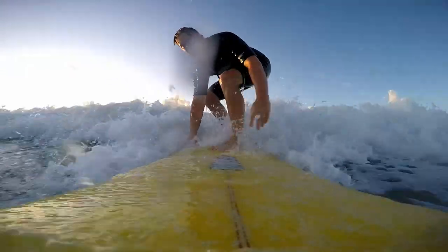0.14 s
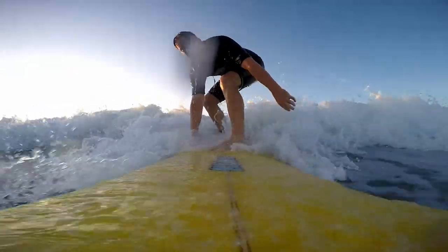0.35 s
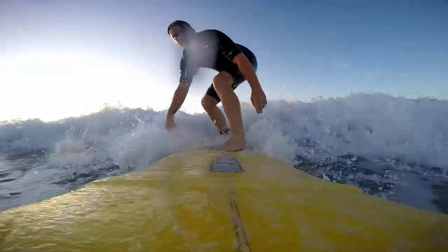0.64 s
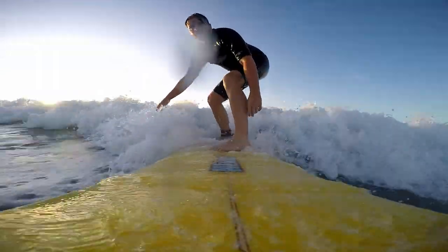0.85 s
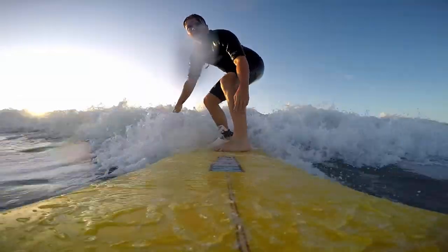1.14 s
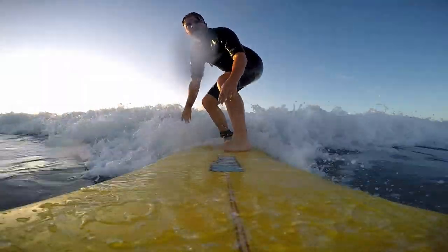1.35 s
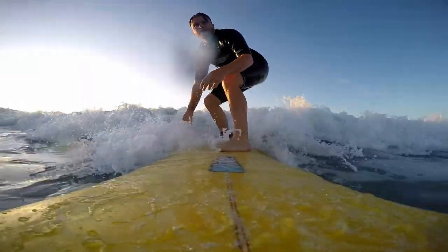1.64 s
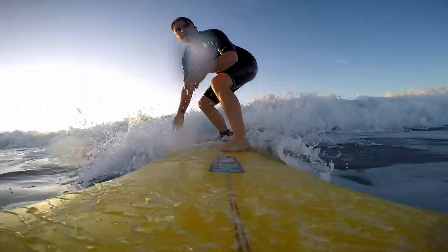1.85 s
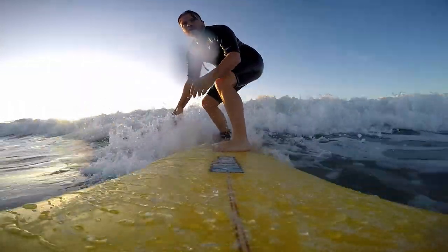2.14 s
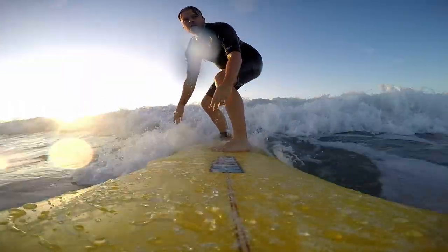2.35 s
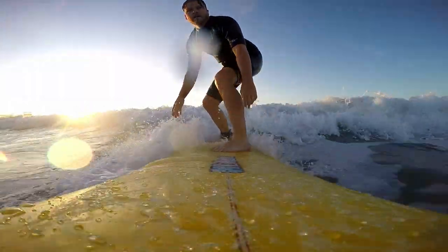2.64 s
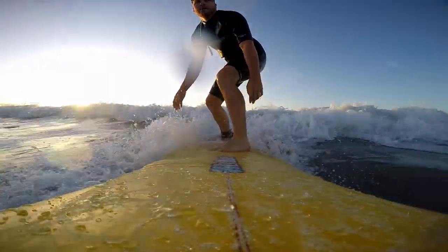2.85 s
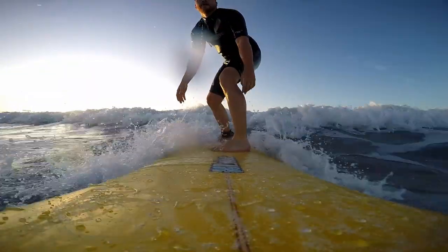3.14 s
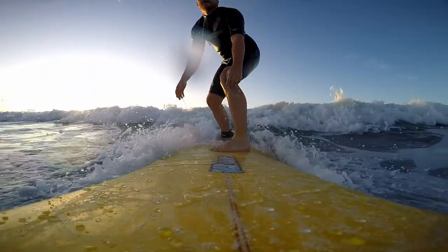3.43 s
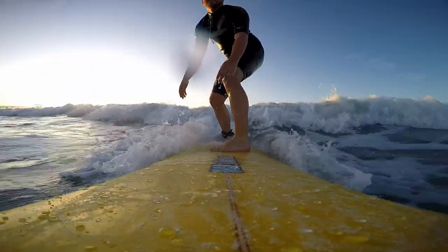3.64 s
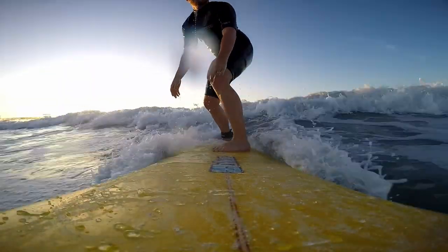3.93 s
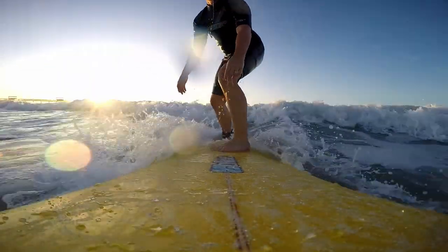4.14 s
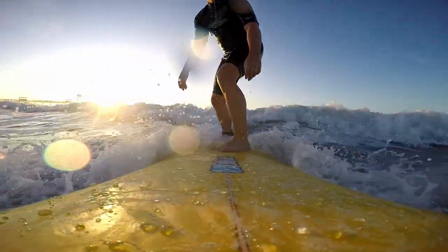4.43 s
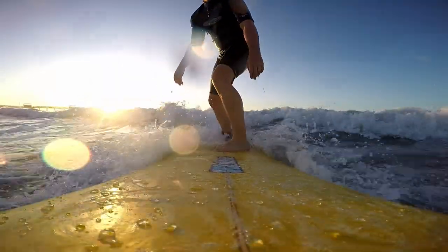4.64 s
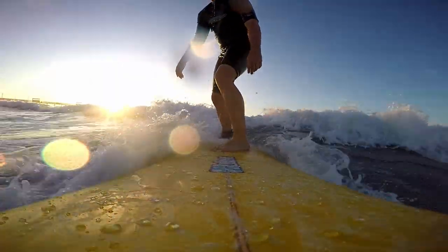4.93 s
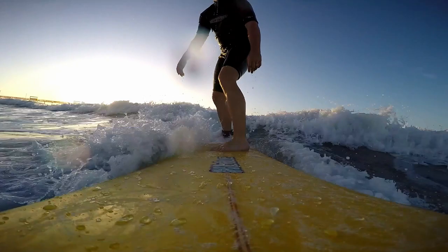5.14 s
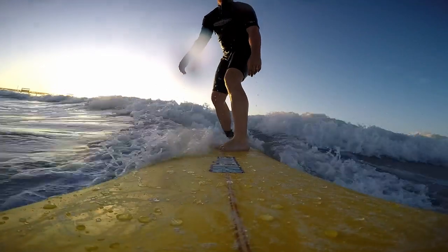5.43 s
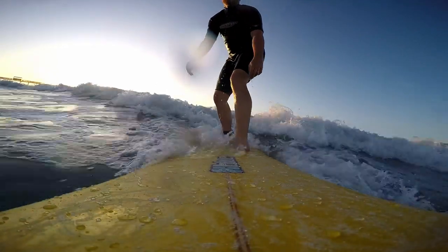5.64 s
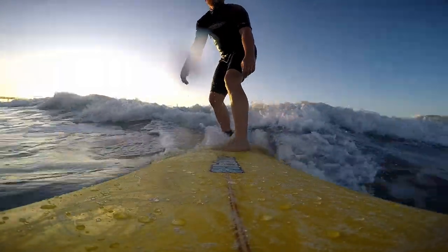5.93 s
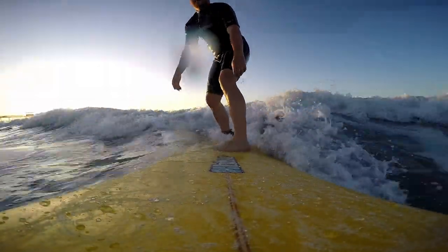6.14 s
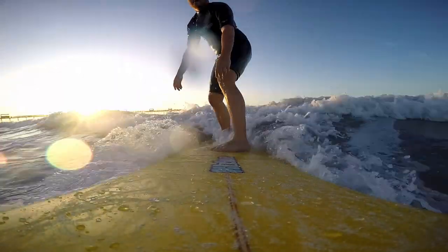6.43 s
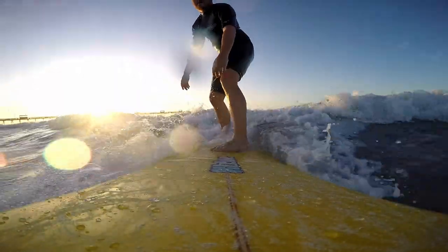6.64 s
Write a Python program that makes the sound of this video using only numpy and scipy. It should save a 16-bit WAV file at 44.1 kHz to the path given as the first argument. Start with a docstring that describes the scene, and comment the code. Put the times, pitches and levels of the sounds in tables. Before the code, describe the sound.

Sealed housing on a surfboard nose, close, dry and muffled. A deep throb near 40 Hz runs throughout, wandering in pitch and pulsing several times a second, with hull drumming around 250 Hz. Over it, whitewater churns in gurgling mid-low bubbles, finer froth and only faint spray hiss. At 0-0.2 s a splash surge, pings and gulps; at 0.4 s a tight cluster of sharp drop knocks and a slap; around 1 s more drops and a flat landing that rings low. Quieter water follows, with booms at 1.4-1.5 and a landing at 2.3. Foam swells towards 3.2, eases, then hollow booms and plastic clacks cluster at 4.1-4.5. Another swell peaks at 5 with brief spray. Slaps and booms hit at 5.4 and 6-6.2, thick gulps at 6.2-6.4, and a hard surge, slap and gulps end it at 6.8. Small plastic rattles recur throughout.

```python
"""Inside a sealed camera housing on the nose of a surfboard that rides a broken wave.
The board bends in a deep, wandering throb; chop drums, slaps and booms on the hull.
Whitewater churns, froths and gulps as clouds of damped bubble tones in coloured noise.
Drops ping, knock and crack on the housing, spray falls as tiny ringing droplets,
and impulses through the mount's plastic resonances make it clack and chatter."""
import sys
import numpy as np
from scipy import signal
from scipy.fft import rfft, irfft, next_fast_len
from scipy.io import wavfile
from scipy.ndimage import uniform_filter1d, map_coordinates

SR = 44100
rng = np.random.default_rng(int(sys.argv[2]) if len(sys.argv) > 2 else 0)


def to_wav(sig):
    """Store sig (one row per channel, or 1-D mono) as 16-bit WAV at the path in sys.argv[1].

    Samples outside -1..1 are clipped; the rate is SR.
    """
    pcm = np.clip(np.atleast_2d(sig), -1, 1) * 32767
    pcm = np.round(pcm).astype(np.int16)
    wavfile.write(sys.argv[1], SR, pcm.T)  # frames by channels


N = 299770

# The broken wave between bumps. Each row: time in seconds, then relative levels in dB
# of churning water, fine foam and airborne spray.
FLOW = [(0.0, -47.5, -53.5, -66.5), (0.36, -45, -52.5, -63), (0.56, -47.5, -53.5, -69),
        (0.9, -48, -56, -71.5), (1.25, -47.5, -55, -70), (1.8, -50.5, -60, -75), (2.1, -44, -50.5, -68),
        (2.7, -40.5, -45, -66), (3.25, -37, -41.5, -61), (3.65, -43, -48, -68), (4.3, -43.5, -46.5, -67.5),
        (5.0, -37.5, -41.5, -65), (5.52, -41.5, -45.5, -65), (5.66, -41, -46.5, -70),
        (5.9, -45.5, -51, -66.5), (6.05, -39, -47, -64), (6.5, -44, -45, -65.5), (6.8, -46.5, -49.5, -64)]
# The board meets a ridge of chop. Each row: centre in seconds, half length in seconds, then relative
# levels in dB of bending and of hull drumming, and the surge of the whitewater in dB.
BUMPS = [(0.006, 0.022, -20, -31.5, 10.5), (0.165, 0.16, -22, -40, 4.5), (0.335, 0.013, -36.5, -32.5, 6.5),
         (0.393, 0.032, -22, -32, 0), (0.462, 0.076, -22, -44.5, 1), (0.663, 0.12, -34, -48.5, 0),
         (0.847, 0.067, -30, -47, -0.5), (1.042, 0.11, -28.5, -46.5, 1), (1.249, 0.13, -35.5, -48.5, -1.5),
         (1.46, 0.08, -22.5, -37.5, 8), (1.596, 0.11, -26.5, -50, 0.5), (1.754, 0.15, -32, -39, 8.5),
         (1.846, 0.039, -27, -38.5, 7.5), (1.992, 0.15, -28.5, -51.5, 0.5), (2.218, 0.054, -22, -42, 1.5),
         (2.302, 0.029, -20, -36, 4.5), (2.362, 0.052, -30.5, -33.5, 2.5), (2.6, 0.046, -26.5, -63, -0.5),
         (2.789, 0.04, -24, -34.5, 2), (2.936, 0.091, -27, -65, -1), (3.173, 0.09, -24, -37, 2),
         (3.296, 0.12, -23, -44, -1.5), (3.464, 0.045, -24, -47, 1), (3.731, 0.055, -28.5, -37, 3),
         (3.839, 0.078, -25, -43, 1), (3.957, 0.055, -25, -40, 2.5), (4.12, 0.039, -33, -33, 0),
         (4.16, 0.14, -23.5, -48, 6.5), (4.424, 0.09, -30, -34, 6.5), (4.717, 0.076, -27.5, -36, 2),
         (4.801, 0.034, -38.5, -47, 4), (4.853, 0.035, -25, -42, -0.5), (5.085, 0.11, -22.5, -38, 2.5),
         (5.314, 0.048, -33, -35.5, 2.5), (5.404, 0.027, -27.5, -37, 3.5), (5.543, 0.035, -23.5, -58, -2),
         (5.648, 0.05, -36.5, -40, 5.5), (5.775, 0.064, -24.5, -43.5, 4.5), (5.887, 0.029, -25, -56, 1),
         (5.997, 0.071, -28, -41.5, 1), (6.156, 0.087, -22, -41, 5), (6.345, 0.058, -23, -38, 5.5),
         (6.536, 0.13, -26.5, -46, 3), (6.683, 0.1, -26, -44.5, 3.5), (6.788, 0.023, -20, -34, 17.5)]
RELEASE = 0.98  # a bump's fall time over its rise time
FROTH_SHARE, SPRAY_SHARE = 1, 0.96  # how much of a surge (in dB) reaches the finer water

# Spectra as heard inside the housing. Each row: frequency in Hz, relative density in dB per Hz.
CHURN_SPECTRUM = [(150, -23), (380, -15), (490, -3), (570, -3), (660, 1), (820, 0), (970, -3.5),
                  (1100, -23), (1600, 0), (2200, -40.5), (4000, -79.5)]
FROTH_SPECTRUM = [(600, -28), (1000, -4), (1120, -7.5), (1300, -2), (1550, -3.5), (1780, -4), (1900, -7.5),
                  (2050, -27.5), (2600, -18), (5000, -62)]
SPRAY_SPECTRUM = [(900, -14.5), (2000, 3), (2500, -3), (3100, -4.5), (3900, -5), (4500, -12), (5600, -14.5),
                  (6600, -17.5), (8400, -19.5), (9500, -24.5), (10500, -41)]
HULL_SPECTRUM = [(40, -3), (80, -13), (130, -10), (200, -1.5), (265, 2.5), (330, -0.5), (420, -5),
                 (700, -22.5), (1500, -59)]
BENDING_SPECTRUM = [(10, -9.5), (19, 2), (25, 5), (31, 0), (42, -7), (54, -5.5), (70, -18.5), (90, -37),
                    (130, -71.5)]
# Patches of pitch in the bubbling water. The one row: depth in dB, width in Hz, length in seconds.
CLUMPS = (1.0, 130, .045)
CHURN_WASH, FROTH_WASH = 1.9, 1.3  # formless noise under the bubbles, over their rms

# Air pockets that collapse beside the board. Each row: start in seconds, peak in dB before the shell's
# low-pass, central pitch in Hz, spread of the bubble onsets in seconds.
GULPS = [(0.173, -26.5, 1380, 0.0025), (0.208, -32.5, 565, 0.009), (0.3, -36, 1600, 0.0038),
         (0.335, -27, 715, 0.019), (2.418, -29, 695, 0.0057), (3.149, -35, 700, 0.022),
         (3.176, -28, 660, 0.024), (3.319, -35, 630, 0.013), (4.364, -28.5, 860, 0.024),
         (4.38, -28.5, 610, 0.02), (4.421, -37, 720, 0.021), (4.785, -25, 680, 0.0046),
         (5.002, -26.5, 1260, 0.02), (5.32, -24, 805, 0.0044), (5.584, -28.5, 1340, 0.0088),
         (5.596, -29, 830, 0.01), (5.986, -28, 845, 0.011), (6.026, -25, 695, 0.0085),
         (6.088, -27, 620, 0.0053), (6.236, -26.5, 627, 0.0057), (6.253, -30, 810, 0.014),
         (6.301, -22.5, 690, 0.014), (6.319, -21.5, 660, 0.017), (6.36, -22.5, 680, 0.027),
         (6.473, -26.5, 1690, 0.03), (6.58, -31, 700, 0.01), (6.651, -24, 660, 0.0098),
         (6.773, -18, 1490, 0.0083), (6.776, -18, 733, 0.0042)]
# Sheets of spray that sweep over the housing. Each row: centre in seconds, level in dB, length in seconds.
SHEETS = [(0.115, -61, 0.19), (0.432, -58, 0.071), (1.038, -66, 0.073), (4.993, -51.5, 0.12),
          (5.645, -60, .06)]
# Drops that hit the housing. Each row: start in seconds, ping relative level in dB, ping pitch in Hz,
# knock relative level in dB, knock pitch in Hz, crack relative level in dB.
DROPS = [(0.012, -33, 3950, -33, 745, -50.5), (0.0323, -37.5, 3400, -32, 810, -39.5),
         (0.036, -32, 1740, -42, 900, -59), (0.067, -42.5, 7700, -40, 900, -54.5),
         (0.109, -43, 5800, -38, 905, -61), (0.0735, -48, 2300, -28.5, 950, -46),
         (0.0918, -27, 1550, -43, 1400, -56), (0.112, -45, 2500, -37, 800, -60),
         (0.1466, -31.5, 3020, -33, 500, -54.5), (0.153, -36, 4300, -37, 600, -52),
         (0.1733, -39, 2290, -31, 1390, -56), (0.4006, -21, 2450, -20, 435, -37.5),
         (0.4009, -31.5, 3800, -19, 1150, -44), (0.4093, -31, 2470, -27, 900, -41.5),
         (0.412, -38, 3900, -34, 700, -49.5), (0.419, -37, 2270, -17.5, 900, -39),
         (0.4204, -38, 2500, -22, 786, -49.5), (0.43, -50, 3400, -30, 900, -65),
         (0.4442, -33.5, 3150, -56, 900, -65), (0.9924, -57, 2100, -28, 496, -71),
         (0.9825, -53, 3400, -35, 1200, -68), (0.998, -47, 2390, -31, 1200, -69),
         (1.0048, -43, 4450, -29.5, 800, -43.5), (1.007, -46, 2600, -29, 1050, -58),
         (1.0246, -41, 3700, -29, 800, -54), (1.028, -47, 6600, -45, 1400, -60),
         (1.0453, -33.5, 2200, -35, 497, -48.5), (1.0477, -41.5, 2650, -44, 900, -59),
         (1.052, -43, 2900, -38, 700, -55), (1.062, -43, 2650, -28.5, 970, -58.5),
         (4.949, -38, 2900, -48, 900, -65)]
PING_CYCLES, KNOCK_CYCLES = 11, 4  # oscillations in a 60 dB decay
OVERTONE, OVERTONE_SHARE = 1.55, 0.2  # pitch ratio and amplitude ratio to the ping
CRACK_T60_S = 0.009

# Resonances of the mount's plastic. Each row: frequency in Hz, width in Hz, relative gain in dB.
MOUNT = [(3630, 236, 2), (3910, 200, 1.5), (4654, 280, 3.5), (5020, 480, -7), (6500, 300, -29.5),
         (7010, 160, -3.5), (7740, 530, -10.5), (9200, 620, -22)]
# The mount's joint snaps against its stop. Each row: time in seconds, relative level in dB.
CLACKS = [(0.2119, -46), (0.3343, -44.5), (0.5896, -51), (1.4596, -50), (1.5878, -55), (1.681, -50),
          (1.8465, -46), (1.8886, -48), (2.291, -46), (2.8742, -49), (2.914, -50), (3.1662, -45),
          (3.297, -47.5), (3.4015, -46), (3.4433, -48), (3.586, -50.5), (3.7315, -50), (3.8686, -51.5),
          (4.1485, -47), (4.2033, -48), (4.3695, -48), (4.4033, -43), (4.4313, -42), (4.4473, -40),
          (4.6204, -50), (4.6613, -51.5), (4.6788, -49), (4.7316, -45), (4.7963, -50), (5.037, -49),
          (5.0816, -50), (5.2854, -53.5), (5.4065, -44.5), (5.4134, -50), (6.0327, -50), (6.04, -53),
          (6.156, -49), (6.1628, -46.5), (6.2916, -48), (6.5022, -47), (6.57, -50)]
# Jolts rattle the mount. Each row: start in seconds, relative level in dB, length in seconds.
RATTLES = [(0.211, -65, 0.033), (0.313, -65.5, 0.022), (.338, -62, 0.012), (0.358, -63.5, .012),
           (0.398, -58.5, 0.016), (0.456, -71, .03), (0.537, -69, 0.0044), (0.596, -68, 0.024),
           (0.729, -69.5, .018), (0.784, -77.5, 0.05), (0.824, -65, 0.02), (0.858, -67, 0.0047),
           (0.917, -76, .012), (0.963, -63.5, 0.005), (1.065, -65, .004), (1.18, -72, 0.165),
           (1.464, -63.5, 0.026), (1.568, -67.5, 0.074), (1.686, -66, 0.09), (1.835, -58.5, 0.017),
           (1.868, -71, 0.03), (1.977, -69, 0.0195), (2.287, -58.5, 0.014), (2.331, -63.5, 0.053),
           (2.478, -65, 0.027), (2.569, -66, 0.0072), (2.597, -71, 0.045), (2.657, -67, .012),
           (2.695, -67.5, .016), (2.787, -69.5, 0.04), (2.876, -65.5, 0.073), (2.926, -67, .046),
           (3.016, -69.5, .04), (3.163, -70, 0.018), (3.256, -68, 0.05), (3.475, -65, 0.0057),
           (3.745, -63, .03), (3.986, -66.5, .004), (4.104, -67.5, 0.021), (4.142, -64.5, 0.022),
           (4.182, -68, 0.054), (4.236, -70.5, 0.09), (4.406, -58.5, 0.009), (4.43, -67, 0.028),
           (4.498, -70.5, 0.085), (4.661, -60, 0.04), (4.736, -58.5, 0.015), (4.801, -63.5, 0.03),
           (4.854, -65, 0.024), (4.923, -68.5, 0.028), (5.041, -62, 0.011), (5.313, -66.5, 0.025),
           (5.398, -63, 0.01), (6.113, -60, .004), (6.162, -53, 0.008), (6.335, -72.5, 0.091),
           (6.522, -71, .03)]
CLACK_DB = 12  # extra gain of clacks over the ticks of a rattle

# Hard slaps of water on the hull. Each row: start in seconds, peak in dB, length in seconds.
SLAPS = [(0.106, -34, .02), (0.149, -31, .025), (0.203, -35, 0.014), (0.331, -30.5, 0.017),
         (0.415, -31, 0.04), (0.859, -36, 0.008), (0.968, -37, 0.0061), (1.006, -32, .02),
         (1.05, -40, 0.038), (1.303, -41, 0.0093), (2.288, -32, 0.036), (2.585, -36, 0.013),
         (4.679, -26, 0.027), (5.395, -28, 0.063), (5.793, -25, 0.013), (6.018, -24.5, 0.016),
         (6.162, -26, 0.02), (6.4, -23, 0.056), (6.775, -26, 0.018)]
# Heavy lumps of water under the hull. Each row: start in seconds, relative level in dB, pitch in Hz.
THUDS = [(0.403, -30, 292), (0.825, -32, 238), (1.426, -26, 220), (1.475, -23, 243), (1.841, -36, 267),
         (2.279, -26, 255), (2.772, -25.5, 252), (3.129, -27, 271), (4.103, -29, 255), (4.198, -24, 262),
         (4.235, -29, 255), (4.407, -22, 255), (4.438, -25, 235), (5.392, -28, 250), (6.097, -20.5, 256),
         (6.152, -22.5, 244), (6.778, -24, 231)]
# The board lands flat and rings on. Each row: start in seconds, relative level of its bending in dB.
LANDINGS = [(0.993, -15), (2.29, -18.5), (2.764, -25.5), (4.405, -17.5)]
LANDING_RISE_S, LANDING_T60_S = 0.016, 0.44
FLEX_LAG_S = 0.0066  # the board bends just after the water pushes
IDLE_FLEX_DB, IDLE_CHOP_DB = 7.5, -5  # between bumps, relative to the churning
FLEX_LIMIT_DB = -17.5  # relative level above which the bending is clipped
FLUTTER_DB, BUFFET_DB = 2.4, -5.5  # scale of the dips; noise relative to the swing
FLEX_TOP_HZ, TOP_HZ = 78, 10250  # low-pass edges of the throb and of the camera


def amp(db):
    """Level is logarithmic: decibels to amplitude gain."""
    return 10 ** (np.asarray(db) / 20)


def unit(x):
    """Normalisation: x at rms 1."""
    return x / np.sqrt(np.mean(x ** 2) + 1e-20)


def curves(rows):
    """Linear interpolation: one value per sample for each column after the time."""
    s, *columns = np.transpose(rows)
    return [np.interp(np.arange(N) / SR, s, column) for column in columns]


def smooth(points):
    """Linear interpolation: evenly spaced points to one value per sample."""
    return np.interp(np.linspace(0, 1, N), np.linspace(0, 1, len(points)), points)


def wobble(rate):
    """Slow random modulation: a smooth curve through rate random knots a second."""
    return map_coordinates(rng.standard_normal(4096), [np.arange(N) * rate / SR], mode="wrap")


def filtered(x, response):
    """Linear filtering: the spectrum of x times a complex response of frequency."""
    size = next_fast_len(N + SR // 2)
    return irfft(rfft(x, size) * response(np.fft.rfftfreq(size, 1 / SR)), size)[:N]


def coloured(x, spectrum):
    """Spectral shaping: x through (Hz, dB) points on a log frequency axis, at rms 1."""
    f, db = np.transpose(spectrum)

    def response(hz):
        return amp(np.interp(np.log(hz + 1), np.log(f), db, left=-120, right=-120))

    return unit(filtered(x, response))


def add(track, s, sound):
    """Superposition: mix a sound into the track at time s."""
    part = track[max(round(s * SR), 0):][:len(sound)]
    part += sound[:len(part)]


def ring(t, hz, cycles, rise=0):
    """Damped oscillation: a sine from t = 0 that falls 60 dB in so many cycles and may glide up."""
    age = np.maximum(t, 0) * hz / cycles
    return amp(-60 * age) * np.sin(2 * np.pi * cycles * age * (1 + rise * age / 2))


def bubbles(count, low_hz, high_hz, cycles, spread_db, rise, size=1024, swell=0):
    """Incoherent sum: ringing grains of random time, pitch and strength, swelling for so many cycles."""
    when, pitch, strength = rng.random((count, 3)).T[:, :, None]
    hz, t = low_hz * (high_hz / low_hz) ** pitch, np.arange(size) / SR
    gain = amp(-spread_db * np.log(np.maximum(strength, 1 / 50)))  # few grains are strong
    grains = gain * ring(t, hz, cycles, rise)
    if swell:
        grains = grains * np.minimum(t * hz / swell, 1)
    places = (when * N).astype(int) + np.arange(size)
    return unit(np.bincount(places.ravel(), grains.ravel(), N)[:N])


def clumped(x, size=1024):
    """Time-frequency modulation: patches of pitch well up and sink away, a gurgle."""
    depth_db, width_hz, length_s = CLUMPS
    hz, t, z = signal.stft(x, SR, nperseg=size)
    field = uniform_filter1d(rng.standard_normal(z.shape), round(width_hz / hz[1]), axis=0)
    field = uniform_filter1d(field, round(length_s / t[1]), axis=1)
    return signal.istft(z * amp(depth_db * unit(field)), SR, nperseg=size)[1][:N]


def bumps(lag=0):
    """Forcing by chop: one row per bump, a bell-shaped push that rises to 1 and falls away."""
    s, length = np.transpose(BUMPS)[:2, :, None]
    u = (np.linspace(0, N / SR, 4096) - s - lag) / length
    return np.exp(-(u / np.where(u < 0, 1, RELEASE)) ** 2)


def shaking(bump_db, idle_db, lag=0):
    """Addition of powers: level in dB of a part that the flow stirs and each bump shakes harder."""
    bump_power = smooth(amp(bump_db) ** 2 @ bumps(lag) ** 2)
    idle_power = amp(curves(FLOW)[0] + idle_db) ** 2
    return 10 * np.log10(bump_power + idle_power)


def whitewater():
    """Bubble resonance: large ones churn, small ones froth and spray hisses; bumps make all surge."""
    churn_db, foam_db, spray_db = curves(FLOW)
    surge_db = smooth(np.transpose(BUMPS)[4] @ bumps()) + 0.68 * wobble(38)
    large = bubbles(4000, 400, 1100, cycles=18, spread_db=1.9, rise=0.12, size=1280, swell=2)
    small = bubbles(7000, 959, 2166, cycles=24.6, spread_db=1.5, rise=0.026)
    fizz = bubbles(9000, 1830, 9000, cycles=17.0, spread_db=4.5, rise=0.15, size=256)

    churn = coloured(clumped(large + CHURN_WASH * rng.standard_normal(N)), CHURN_SPECTRUM)
    froth = coloured(clumped(small + FROTH_WASH * rng.standard_normal(N)), FROTH_SPECTRUM)
    spray = coloured(fizz + 2.5 * rng.standard_normal(N), SPRAY_SPECTRUM)
    churn *= amp(churn_db + 0.08 + surge_db)
    froth *= amp(foam_db - 1.93 + FROTH_SHARE * surge_db)
    spray *= amp(spray_db + 2.0 + SPRAY_SHARE * surge_db)
    return churn + froth + spray


def gulps(count=6):
    """Bubble resonance: an air pocket breaks into a few bubbles near one pitch, the first strongest."""
    out, t, order = np.zeros(N), np.arange(SR // 8) / SR, np.arange(count)[:, None]
    for s, db, hz, length in GULPS:
        delay, detune = rng.random((2, count, 1))
        starts = length * (order + delay * (order > 0)) / count
        pitches = hz * 2 ** (0.17 * (detune - 0.5))
        rings = ring(t - starts, pitches, cycles=19.0, rise=0.034)
        cluster = (rings / (1 + 0.066 * order)).sum(0)
        add(out, s, amp(db) * cluster / np.abs(cluster).max())
    # the shell shuts out the treble
    return filtered(out, lambda hz: 1 / np.sqrt(1 + (hz / 1800) ** 16))


def sheets():
    """Random impacts: flung water lands as a shower of tiny separate droplets."""
    t = np.arange(N) / SR
    cover = sum(amp(db) * np.exp(-(2 * (t - s) / length) ** 4) for s, db, length in SHEETS)
    droplets = bubbles(3000, 1000, 7000, cycles=7, spread_db=4, rise=0.08, size=640)
    spectrum = [(700, 9.0), (1400, 4.0), (2600, 2), (4000, -7.5), (6500, -22.0), (9500, -18)]
    return cover * coloured(droplets, spectrum)


def drops(shell_hz=7000, crack_hz=3500):
    """Impact excitation: a drop pings the shell, knocks the housing and bursts with a bright crack."""
    out, cracks, t = np.zeros(N), np.zeros(N), np.arange(SR // 25) / SR
    for s, ping_db, ping_hz, knock_db, knock_hz, crack_db in DROPS:
        ping = ring(t, ping_hz, PING_CYCLES)
        ping += OVERTONE_SHARE * ring(t, OVERTONE * ping_hz, PING_CYCLES)
        ping *= 1 - np.exp(-t / 0.00028)  # rise time in seconds
        knock = ring(t, knock_hz, KNOCK_CYCLES) * (1 - np.exp(-t / 0.00014))
        add(out, s, 1.8 * amp(ping_db) * ping + amp(knock_db) * knock / np.abs(knock).max())
        burst = rng.standard_normal(len(t)) * amp(crack_db - 60 * t / CRACK_T60_S)
        add(cracks, s, 0.78 * burst)

    def crack_band(hz):
        return 1j * hz / (crack_hz + 1j * hz) / np.sqrt(1 + (hz / 9000) ** 10)

    return filtered(out + filtered(cracks, crack_band), lambda hz: 1 / (1 + 1j * hz / shell_hz))


def plastic(f):
    """Modal response: a sum of resonances with alternating sign."""
    total = 0
    for k, (centre, width, db) in enumerate(MOUNT):
        mode = 1j * f * width / (centre * centre - f * f + 1j * f * width)
        total = total + (-1) ** k * amp(db) * mode
    return total


def mount(count=48):
    """Impulse response: clacks, quick uneven runs of ticks and faint stray ticks excite the plastic."""
    ticks = np.zeros(N)
    for s, db in CLACKS:
        add(ticks, s, amp([db + CLACK_DB]))
    for s, db, length in RATTLES:
        gaps = 0.002 + rng.exponential(0.003, count)  # seconds
        sizes = amp(rng.normal(0, 4.5, count))
        delays = np.cumsum(gaps) - gaps[0]
        inside = delays < length
        # a rattle's energy depends only on its level and length
        sizes = sizes[inside] * np.sqrt(length * SR / np.sum(sizes[inside] ** 2))
        ticks += np.bincount(((s + delays[inside]) * SR).astype(int), amp(db) * sizes, N)[:N]
    stray = (rng.random(N) < 30 / SR) * amp(-56.0 + 3 * rng.standard_normal(N))  # about 30 a second
    return amp(13.5) * filtered(ticks + stray, plastic)


def slaps(wash=0.26):
    """Impact of a flat water face: a sudden push, then a dull burst that the wet hull damps at once."""
    out, t = np.zeros(N), np.arange(SR // 10) / SR
    shell = signal.cheby1(6, 1, [230, 1750], "band", fs=SR, output="sos")
    for s, db, length in SLAPS:
        push = ring(t, 910, cycles=2.4)
        burst = wash * rng.standard_normal(len(t)) * amp(-40 * t / length)
        smack = signal.sosfilt(shell, push + 2 * burst)
        add(out, s, amp(db) * smack / np.abs(smack).max())
    return out


def thuds(cycles=16, rise_s=0.0048):
    """Cavity resonance: a heavy lump of water makes the hollow hull boom for a moment."""
    out, t = np.zeros(N), np.arange(SR // 6) / SR
    for s, db, hz in THUDS:
        lower_hz = 0.68 * hz * amp(rng.normal(0, 0.31))
        boom = ring(t, hz, cycles) + 0.5 * ring(t, lower_hz, cycles / 2)
        add(out, s, amp(db) * boom * (1 - np.exp(-t / rise_s)))
    return out


def hull():
    """Random excitation of a shell: chop drums underneath in short dull thuds over a wash."""
    chop_db = shaking(np.transpose(BUMPS)[3], IDLE_CHOP_DB)
    drumming = bubbles(1800, 90.0, 385, cycles=7.1, spread_db=2.0, rise=0, size=2048)
    wash = coloured(rng.standard_normal(N), [(50, 0.0037), (900, 0.016)])
    return amp(chop_db - 0.4) * coloured(drumming + 0.6 * wash, HULL_SPECTRUM)


def bending():
    """Forced vibration: swing level in dB, pushed by bumps, kicked by landings, held below a ceiling."""
    power = amp(shaking(np.transpose(BUMPS)[2], IDLE_FLEX_DB, FLEX_LAG_S)) ** 2
    for s, db in LANDINGS:
        age = np.maximum(np.arange(N) / SR - s, 0)
        kick = amp(db - 60 * age / LANDING_T60_S) * (1 - np.exp(-age / LANDING_RISE_S))
        power = power + kick ** 2
    return np.minimum(10 * np.log10(power), FLEX_LIMIT_DB)


def board(mode_hz=39.0, wander_hz=2.86, level_db=0.18):
    """Modal vibration: the lowest bending mode throbs, wandering in pitch as the water loads it."""
    flex_db = bending()
    calm = amp(-0.4 * (flex_db - flex_db.mean()))  # a strong swing holds its pitch and level best
    pitch_hz = mode_hz + wander_hz * calm * wobble(16)
    swing = np.sin(2 * np.pi * np.cumsum(pitch_hz) / SR)
    buffet = amp(BUFFET_DB) * coloured(rng.standard_normal(N), BENDING_SPECTRUM)
    # water briefly checks the swing
    dips_db = -FLUTTER_DB * calm * np.minimum(np.abs(wobble(26)), 2)
    throb = amp(flex_db + level_db) * unit(amp(dips_db) * (unit(swing) + buffet))
    # a low-pass keeps the throb deep and smooth
    return filtered(throb, lambda hz: 1 / np.sqrt(1 + (hz / FLEX_TOP_HZ) ** 10))


def scene():
    """Superposition: every source reaches one microphone inside the housing."""
    water = whitewater() + gulps() + sheets()
    housing = drops() + mount()
    surfboard = slaps() + thuds() + hull() + board()
    return (water + housing + surfboard)[None]


def record(dry):
    """Band limitation: the camera keeps nothing above its upper limit."""
    return filtered(dry[0], lambda hz: hz < TOP_HZ)[None]


dry = scene()
out = record(dry)
to_wav(out)
```